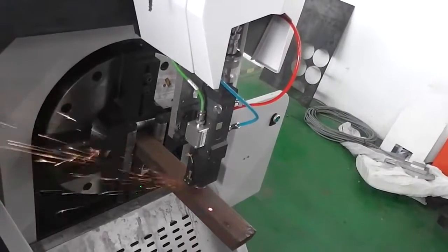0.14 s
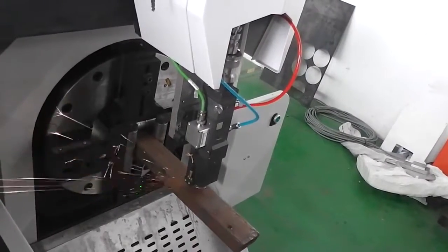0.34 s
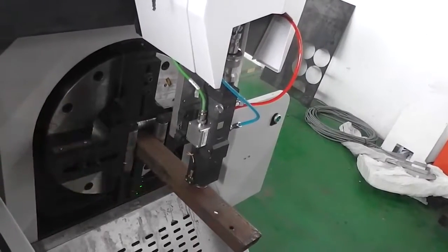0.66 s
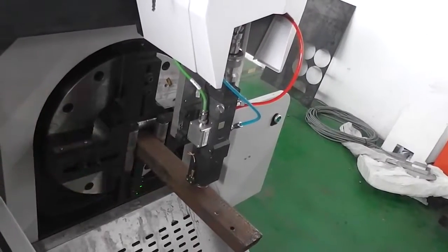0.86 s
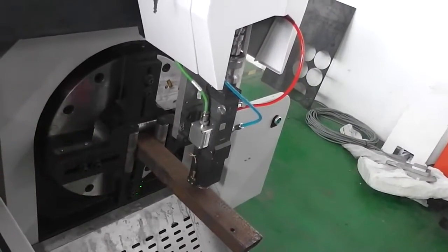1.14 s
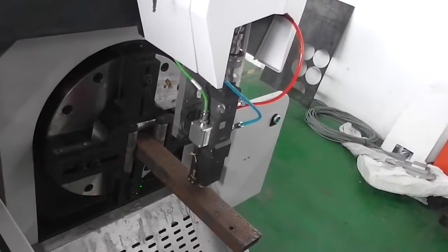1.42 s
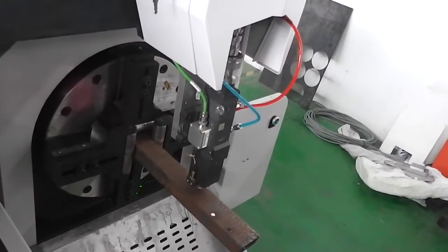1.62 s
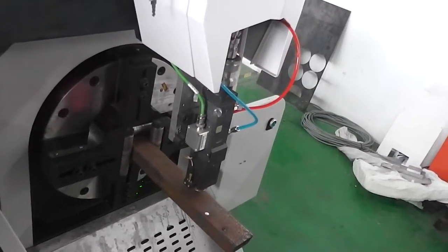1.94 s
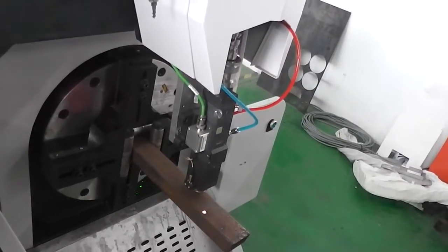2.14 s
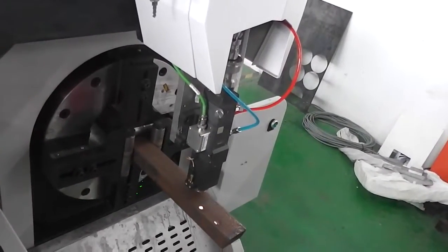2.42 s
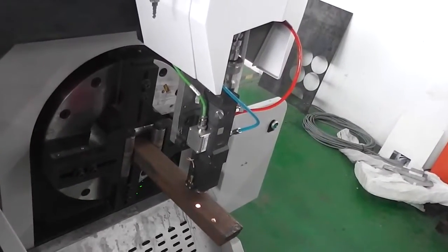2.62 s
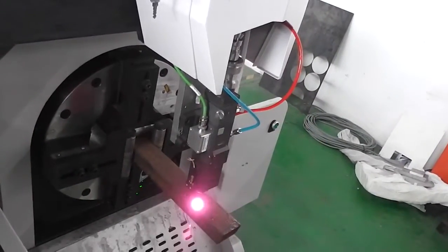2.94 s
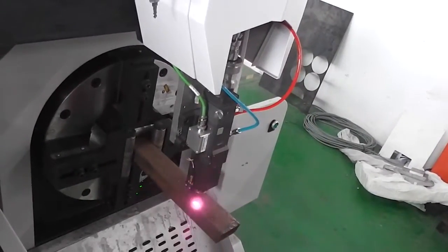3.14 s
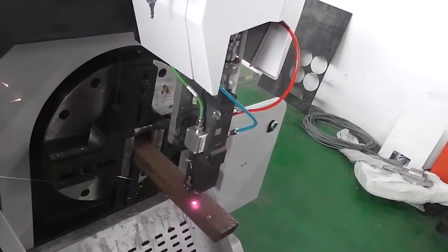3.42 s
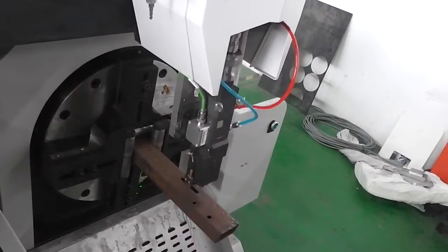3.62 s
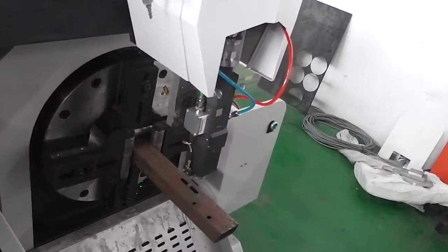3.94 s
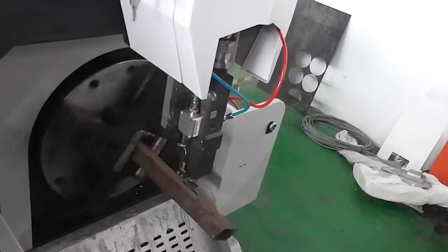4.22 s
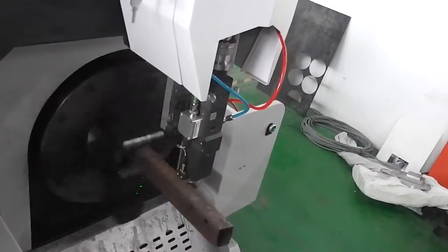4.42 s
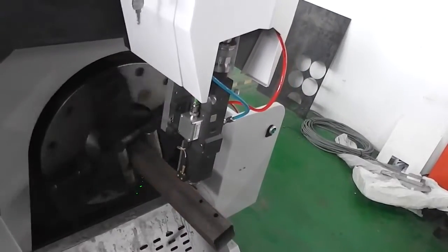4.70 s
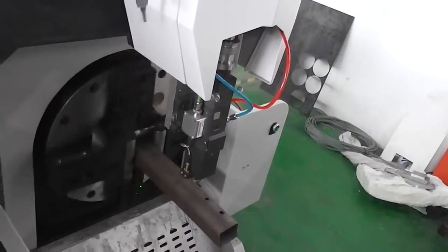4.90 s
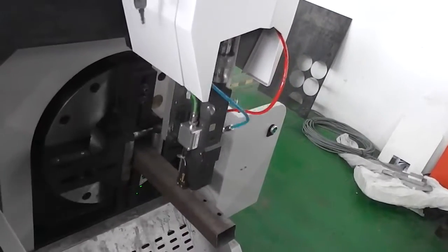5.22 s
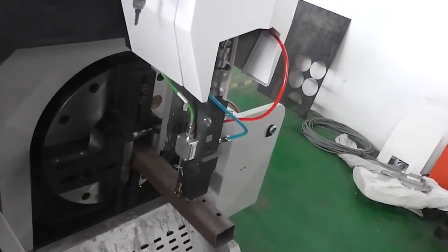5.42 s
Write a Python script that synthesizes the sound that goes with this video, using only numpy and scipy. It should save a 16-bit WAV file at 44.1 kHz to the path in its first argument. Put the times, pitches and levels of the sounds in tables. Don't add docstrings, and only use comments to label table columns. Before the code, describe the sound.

Close in a workshop, a laser cutter's gas jet hisses bright and steady over a hollow, resonant roar in a steel tube, with small dips in the flow. The roar strengthens, then the hiss turns uneven as the head lifts and the tube jolts with ringing knocks. Gas shuts off in sharp puffs with high whistle chirps, and motor rumble swells as the microphone's automatic gain opens.

```python
import sys
import numpy as np
from scipy import signal
from scipy.io import wavfile
from scipy.ndimage import uniform_filter1d

SR = 44100
rng = np.random.default_rng(int(sys.argv[2]) if len(sys.argv) > 2 else 0)


def linear_from_db(decibels):
    return 10 ** (np.asarray(decibels, float) / 20)


def generate_wav(sig):
    pcm = np.round(np.clip(np.atleast_2d(sig).T, -1, 1) * 32767).astype(np.int16)
    wavfile.write(sys.argv[1], SR, pcm)


N = 245195
HOP, SIZE = 128, 512


def evened(x):
    return x / np.sqrt(np.mean(x ** 2) + 1e-20)


def read(points, hz):
    f, value = np.transpose(points)
    return np.interp(np.log(hz + 1), np.log(f + 1), value)


def curves(rows, t):
    s, *columns = np.transpose(rows)
    return [np.interp(t, s, c, c[0], c[-1]) for c in columns]


def grid(stretch):
    times_s = np.arange(N // (HOP * stretch) + 5) * HOP * stretch / SR
    return times_s, np.fft.rfftfreq(SIZE * stretch, 1 / SR)[:, None]


def humps(modes, hz):
    return sum(linear_from_db(2 * db) / (1 + (2 * (hz - f) / w) ** 2) for f, w, db in modes)


def bumps(rows, t, rise_s):
    return sum(db * np.exp(-((t - at) / np.where(t < at, rise_s, fall_s)) ** 2) for at, db, fall_s in rows)


def notes(rows, rise_s, t60_s):
    t = grid(1)[0]
    power = 0
    for at, length_s, db in rows:
        attack = np.clip((t - at) / rise_s, 0, 1)
        release_db = -60 * np.clip(t - at - length_s, 0, None) / t60_s
        power = power + (attack * linear_from_db(db + release_db)) ** 2
    return np.interp(np.arange(N) / SR, t, np.sqrt(power))


# hz, left_right_likeness
LIKENESS = [(60, 0.8), (200, 0.91), (500, 0.9), (1200, 0.94), (1800, 0.96), (2500, 0.68), (5500, 0.81),
            (7500, 0.85), (9500, 0.48), (11500, 0.49), (15000, 0.7)]
# hz, left_minus_right_db
BALANCE = [(60, 4), (150, 1), (380, 2.5), (950, 1.5), (2380, 0.0), (5980, 2.0), (15000, 1)]


def noise(gain, level_db, lo_hz, hi_hz, stretch, patchy_db, flicker_db):
    t, hz = grid(stretch)
    a, b, c, d, patches = rng.standard_normal((len(t), len(hz), 5)).T
    patches = uniform_filter1d(patches, size=6 * stretch, axis=0)
    patches = evened(uniform_filter1d(patches, size=16 // stretch, axis=1))
    flicker = evened(uniform_filter1d(rng.standard_normal(len(t)), size=8 // stretch))
    gain = gain * np.ones((len(hz), len(t)))
    inside = (hz >= lo_hz) & (hz <= hi_hz)
    band_rms = np.sqrt((gain ** 2 * inside).sum(0))
    gain = gain / band_rms * linear_from_db(level_db + patchy_db * patches + flicker_db * flicker)
    same = np.clip(read(LIKENESS, hz), 0, 1)
    left = a + 1j * b
    right = same * left + np.sqrt(1 - same ** 2) * (c + 1j * d)
    lean = linear_from_db(np.array([.5, -.5])[:, None, None] * read(BALANCE, hz))
    z = np.array([left, right]) * lean * gain
    return 0.65 * signal.istft(z, nperseg=SIZE * stretch, noverlap=(SIZE - HOP) * stretch)[1][:, :N]


def fuzzy(modes):
    s, out = np.arange(N) / SR, 0
    knots_s = np.arange(N // HOP + 2) * HOP / SR
    for hz, width_hz, db in modes:
        r = np.exp(-np.pi * width_hz * HOP / SR)
        slow = signal.lfilter([np.sqrt(1 - r * r)], [1, -r], rng.standard_normal((2, N // HOP + 2)))
        a, b = (np.interp(s, knots_s, v) for v in slow)
        tone = a * np.cos(2 * np.pi * hz * s) + b * np.sin(2 * np.pi * hz * s)
        out = out + linear_from_db(db) * np.sqrt(width_hz) * tone
    return evened(out)


def lifted(t):
    peak_s, rise_s, fall_s = 3.87, 0.21, 0.65
    return bumps([(peak_s, 1, fall_s)], t, rise_s)


# start_s, depth_db, length_s
CHOKES = [(0.23, 1.5, .025), (0.576, 3, 0.058), (0.833, 2.5, .025), (1.043, -1, .016), (1.158, 2, .044),
          (1.322, 1.3, 0.042), (1.708, 2.8, 0.046), (1.973, 3, 0.076), (2.132, 1.5, 0.045),
          (2.26, 2.5, .04), (2.35, 0, 0.018), (2.58, 4.5, 0.025), (3.038, 2.5, 0.06), (3.237, 3, 0.014),
          (3.442, 3.5, 0.044), (3.688, 2, 0.011)]


def choke_db(t):
    return -sum(db * np.exp(-6 * ((t - at) / length_s) ** 2) for at, db, length_s in CHOKES)


# start_s, flow_db, closeness_to_steel_db
JET = [(0.0, -11, 0.5), (0.89, -10.5, 0.5), (3.4, -11, 3), (3.55, -11, -3), (3.62, -11.5, -9),
       (3.77, -10.5, 7), (3.92, -8.5, -6), (4.15, -16, -5.5), (4.33, -15, -7), (4.39, -9.5, -3),
       (4.44, -12.5, -2), (4.51, -10, 5), (4.57, -13, -14), (4.62, -10, -11), (4.68, -17.5, -9),
       (4.74, -17, 1), (4.85, -12.5, 7), (4.92, -18, 0)]
# hz, level_db_per_hz
JET_COLOUR = [(1350, -27.5), (2050, -49), (2350, -13), (3150, -9), (3700, -5.5), (4140, -7), (4480, -5),
              (5700, -8), (6750, -4.5), (7930, -6), (8660, -1.5), (9620, -4), (11000, -9), (14600, -10.5),
              (15700, -15.5)]


def jet():
    t, hz = grid(1)
    level_db, fizz_db = curves(JET, t)
    lift = lifted(t)
    gap_db = -5.0 + 0.31 * fizz_db + 4 * lift
    body_db = -30.0 + 0.23 * (roar(t)[0] + 30) + 0.51 * (level_db + 10.5) + 2 * lift
    fizz = np.clip(np.log2((hz + 1) / 7500) / 1.08, 0, 1.3) * (fizz_db + 2.5)
    gap = np.exp(-((hz - 7250) / 800) ** 4) * 1.1 * (gap_db + 7.0)
    gap = gap - 4.3 * lift * np.exp(-((hz - 8800) / 700) ** 2)
    body = np.exp(-.5 * ((hz - 3300) / 1100) ** 2) * 1.09 * (body_db - level_db + 13)
    shut_db = -450 * np.clip(t - JET[-1][0], 0, None)
    colour_db = read(JET_COLOUR, np.minimum(hz, 15000))
    flow_db = level_db + choke_db(t) + shut_db
    return noise(linear_from_db(colour_db + fizz + gap + body), flow_db, 3000, 14500, 1, patchy_db=0.5, flicker_db=0.62)


# start_s, level_db, centre_hz
ROAR = [(0.0, -24.5, 1570), (0.4, -29, 1630), (1.39, -32, 1613), (2.14, -31.5, 1470), (2.48, -25, 1560),
        (2.65, -23.5, 1430), (2.8, -21, 1650), (3.7, -19, 1760), (3.82, -26.5, 1740), (4.06, -25.5, 1690),
        (4.3, -19, 1790), (4.38, -20, 1640), (4.43, -27.5, 1550), (4.89, -29, 1350), (5.0, -44, 1550),
        (5.24, -51, 1420), (5.45, -31.5, 1310), (5.56, -57, 1300)]
# peak_s, change_db, fall_s
SURGES = [(2.34, 1, 0.037), (2.41, -1, .04), (3.44, -2, 0.037), (3.58, -4, 0.031), (3.84, -4, 0.032),
          (3.93, 1, .03), (3.98, -2, 0.022), (4.09, 0, 0.06), (4.63, 10, 0.073), (4.885, 1.5, 0.04),
          (5.035, 19, 0.088)]


def roar(t):
    level_db, centre_hz = curves(ROAR, t)
    return level_db + bumps(SURGES, t, rise_s=0.022), centre_hz


# centre_hz, width_hz, level_db
WALL_MODES = [(1130, 30, 0), (1270, 25, 1), (1420, 50, 2), (1525, 36, 5), (1680, 50, 3), (1840, 36, 5),
              (1930, 50, 1), (2070, 50, 2), (2220, 50, 1), (2400, 60, 1)]
# centre_hz, width_hz, level_db
STANDING = [(635, 11, 13), (722, 16, 4), (813, 16, 8), (895, 12, 7), (979, 12, 10), (1063, 12, 8)]
# peak_s, boost_db, fall_s
PIERCES = [
    (0.0, 4, .4),
    (2.02, 8, 0.1),
    (2.24, 4.5, 0.22),
    (2.5, 5, 0.77),
    (3.55, 4.5, 0.037),
    (4.38, 6.5, 0.037),
    (4.6, 0.5, 0.023),
]


def tube():
    t, hz = grid(4)
    level_db, centre_hz = roar(t)
    low_db = -35.0 + 0.29 * (level_db + 28) + 0.65 * (rumble_level_db(t) + 36) + bumps(PIERCES, t, rise_s=0.045)
    broad = 0.46 + 1 / (1 + (np.log2((hz + 1) / centre_hz) / 0.32) ** 2)
    bottom_hz = 1050 - 200 * lifted(t - .1)
    top_hz = 2330 + 45 * (curves(ROAR, t)[0] + 26)
    edges = 1 / np.sqrt((1 + (bottom_hz / (hz + 1)) ** 12) * (1.5 + (hz / top_hz) ** 24))
    low_edges = 1 / np.sqrt((1 + (580 / (hz + 1)) ** 12) * (1 + (hz / 1100) ** 12))
    roar_db, drone_db = level_db + 1.5, low_db + 3.0
    rush = noise(broad * edges, roar_db, 1100, 2400, 4, patchy_db=1.3, flicker_db=.8)
    drone = noise(low_edges, drone_db, 600, 1100, 4, patchy_db=1.1, flicker_db=.6)
    s = np.arange(N) / SR
    wall = fuzzy(WALL_MODES) * linear_from_db(np.interp(s, t, roar_db) - 5)
    lowest = fuzzy(STANDING[:1]) * linear_from_db(-9.5 * np.clip((s - 2.45) / 0.13, 0, 1) - 5.5)
    standing = (lowest + .75 * fuzzy(STANDING[1:])) * linear_from_db(np.interp(s, t, drone_db) - 3.5)
    return rush + drone + wall + standing


# start_s, peak_db, t60_s, low_re_puff_db, top_re_puff_db
PUFFS = [
    (4.932, -9.5, 0.32, -14, 14),
    (5.027, -1, 0.16, -6, -4),
    (5.119, -15.5, 0.034, -8, -5),
    (5.245, -28, .06, -12, 9),
]
# hz, level_db_per_hz
PUFF_COLOUR = [(290, -48), (500, -22), (2080, -34), (2740, -26), (3210, -15.5), (3880, -18), (6510, -6.5),
               (9750, -13.5), (12500, -23), (15700, -25)]


def puffs():
    rise_s, top_fade_db_per_s = 0.00042, 300.0
    colour_db = read(PUFF_COLOUR, np.minimum(grid(1)[1], 15000))
    burst = noise(linear_from_db(colour_db), 0, 4000, 15000, 1, patchy_db=1.5, flicker_db=0)
    low = signal.lfilter(*signal.butter(2, 2500, fs=SR), burst)
    top = signal.lfilter(*signal.butter(2, 9000, "high", fs=SR), burst)
    out = np.zeros((2, N))
    for at, db, t60_s, low_db, top_db in PUFFS:
        on = slice(round(at * SR), N)
        age = np.arange(N - on.start) / SR
        mix = (burst - top + linear_from_db(low_db) * low)[:, on]
        mix = mix + linear_from_db(top_db - top_fade_db_per_s * age) * top[:, on]
        out[:, on] += mix * linear_from_db(db - 5.0 - 60 * age / t60_s) * (1 - np.exp(-age / rise_s))
    return out


# start_s, length_s, level_db
HIGH_WHISTLE = [
    (5.06, 0.027, -31),
    (5.1, 0.17, -49),
    (5.254, 0.055, -27),
    (5.316, 0.015, -22.5),
    (5.36, 0.019, -29),
    (5.39, .06, -48),
]
# start_s, length_s, level_db
LOW_WHISTLE = [
    (5.0, .12, -48),
    (5.13, .1, -45),
    (5.257, .036, -35),
    (5.3, .08, -53),
]


def whistle(rows, hz):
    s = np.arange(N) / SR
    waver = 1 + .2 * evened(uniform_filter1d(rng.standard_normal(N), size=500))
    tone = np.cos(2 * np.pi * hz * s + np.array([[0], [.9]]))
    return np.sqrt(2) * notes(rows, rise_s=0.004, t60_s=0.13) * waver * tone


# start_s, level_db, nozzle_band_re_level_db
LEAK = [
    (4.96, -29.5, 1),
    (5.02, -29.5, 1),
    (5.07, -36.5, 2),
    (5.31, -37, 3),
    (5.56, -28.5, 6),
]
# hz, level_db_per_hz
LEAK_COLOUR = [(900, -10), (1500, -1.5), (2200, -9), (2800, -13.5), (3700, -10), (6700, -10), (9000, -13.5),
               (10500, -12), (11800, -23), (13500, -18), (15700, -24)]


def leak():
    t, hz = grid(1)
    level_db, nozzle_db = curves(LEAK, t)
    start_db = -900 * np.clip(JET[-1][0] - t, 0, None)
    top_db = 9.0 * (t < LEAK[1][0]) - .25 * (level_db + 39)
    band_db = nozzle_db * np.exp(-((hz - 6900) / 500) ** 2) + top_db * np.clip((hz - 10500) / 2000, 0, 1)
    gain = linear_from_db(read(LEAK_COLOUR, hz) + band_db)
    return noise(gain, level_db + start_db + 3.0, 2500, 10000, 1, patchy_db=-0.3, flicker_db=0.5)


# start_s, pitch_hz, level_db, t60_s
RINGS = [
    (3.595, 1120, -17, .45),
    (4.612, 1270, -14, .3),
    (4.57, 990, -22, .45),
    (3.5, 1840, -20, .4),
    (5.06, 2164, -32, .55),
    (5.04, 13500, -46, .6),
    (5.117, 3750, -27, .05),
    (5.1, 4608, -41, .8),
    (5.13, 5749, -42, .8),
]


def rings():
    out = np.zeros(N)
    for at, hz, db, t60_s in RINGS:
        age = np.arange(N - round(at * SR)) / SR
        envelope = linear_from_db(db - 60 * age / t60_s) * (1 - np.exp(-age / 0.0033))
        out[N - len(age):] += envelope * np.sin(2 * np.pi * hz * age)
    return out


# start_s, length_s, level_db
WHINES = [
    (4.76, 0.066, -34),
    (5.26, .06, -34),
    (5.32, 0.17, -30.5),
]
# centre_hz, width_hz, level_db
WHINE_MODES = [(1227, 60, -7), (1330, 41, 3)]


def drive_whine():
    return fuzzy(WHINE_MODES) * notes(WHINES, rise_s=0.035, t60_s=0.3)


# start_s, level_db
RUMBLE_LEVEL = [(0.0, -34), (0.66, -32.5), (1.27, -35), (3.73, -36.5), (3.81, -45), (4.04, -52), (4.15, -40.5),
                (4.4, -35), (4.52, -28), (4.8, -19.5), (4.99, -18.5), (5.06, -32.5), (5.3, -25.5), (5.33, -20.5),
                (5.39, -16.5), (5.47, -19), (5.54, -13), (5.56, -39)]
# peak_s, change_db, fall_s
SLACKS = [
    (0.57, -3, 0.095),
    (4.96, -5.5, 0.018),
]


def rumble_level_db(t):
    return curves(RUMBLE_LEVEL, t)[0] + bumps(SLACKS, t, rise_s=0.024)


# hz, level_db_per_hz
RUMBLE_COLOUR = [(12, -58), (20, -29), (97, -9), (149, -8), (193, -2), (233, -10), (272, -1.5), (511, -15),
                 (561, -9), (800, -16.5), (1040, -59), (1760, -120)]
# centre_hz, width_hz, level_db
BED_MODES = [(158, 17, -17), (297, 25, -13), (381, 14, 5.5), (476.5, 10, 10.5), (510, 40, 10.5)]
# multiple_of_pump_speed, level_db
PUMP_ORDERS = [(3, -16), (4, -10.5), (5, -9.5), (7, -7.5), (8, -2.5), (9, 1.5), (11, -19), (12, -6),
               (13, 3), (14, 3), (15, -4.5), (16, -4.5), (17, -12.5), (19, -5.5), (20, 0), (21, 0.5),
               (23, -2.5), (24, -6), (25, 0.5), (27, -3.5), (29, -6.5), (30, -2), (31, -4), (33, -16),
               (34, -21), (36, -35), (37, 2.5)]
# start_s, length_s, level_db
HUM = [
    (3.89, 0.035, -36),
    (4.2, 0.22, -51),
    (4.54, 0.036, -30),
    (4.63, 0.03, -19.5),
    (4.785, 0.17, -25),
    (5.15, 0.061, -29),
    (5.31, 0.038, -13.5),
    (5.36, 0.12, -15.5),
    (5.52, 0.02, -16.5),
]


def rumble():
    pump_hz, hum_hz = 17.582, 238
    t, hz = grid(4)
    level_db = rumble_level_db(t)
    swell_db = 0.12 * (level_db + 34.0)
    colour = linear_from_db(read(RUMBLE_COLOUR, hz)) * np.sqrt(0.76 + humps(BED_MODES, hz))
    wash = noise(colour, level_db + swell_db + 0.23, 60, 640, 4, patchy_db=2.0, flicker_db=1.45)
    s = np.arange(N) / SR
    orders, order_db = np.transpose(PUMP_ORDERS)
    turn = np.linspace(0, 2 * np.pi, 4096)
    phases = 0.8 * rng.uniform(0, 2 * np.pi, (len(orders), 1))
    pattern = linear_from_db(order_db) @ np.cos(orders[:, None] * turn + phases)
    pump_db = np.interp(s, t, level_db)
    pump = evened(np.interp(s * pump_hz % 1, turn / (2 * np.pi), pattern))
    pump = pump * linear_from_db(pump_db - 0.071 * (pump_db + 40.0) - 3.0)
    throb = 1 + 0.42 * np.cos(2 * np.pi * pump_hz * s + 3.13)
    drift = 1 + .01 * evened(uniform_filter1d(rng.standard_normal(N), size=3000))
    hum = np.cos(2 * np.pi * hum_hz * np.cumsum(drift) / SR) * notes(HUM, rise_s=0.035, t60_s=0.29)
    return wash * throb + (pump + hum * throb) * linear_from_db([[1.1], [-1.1]])


def scene():
    whistles = whistle(HIGH_WHISTLE, hz=9908) + whistle(LOW_WHISTLE, hz=5083)
    return jet() + tube() + puffs() + whistles + leak() + rings() + drive_whine() + rumble()


def gate(x, lo_hz, shut_db):
    hz, _, z = signal.stft(x, SR, nperseg=1024, noverlap=512)
    power = uniform_filter1d((abs(z) ** 2).mean(0), size=14, axis=0)
    faint = (power < linear_from_db(2 * shut_db)) & (hz[:, None] > lo_hz)
    return signal.istft(z * ~faint, SR, nperseg=1024, noverlap=512)[1][:, :N]


def top_cut(x):
    return signal.sosfilt(signal.butter(12, 15890, fs=SR, output="sos"), x)


def record(dry):
    edge = signal.firwin(1023, 15800, window=("kaiser", 9), fs=SR)[None]
    limited = 1.552 * np.tanh(dry / 1.734)
    mix = gate(signal.oaconvolve(limited, edge, "same"), lo_hz=10600, shut_db=-73)
    return top_cut(mix)


dry = scene()
out = record(dry)
generate_wav(out)
```